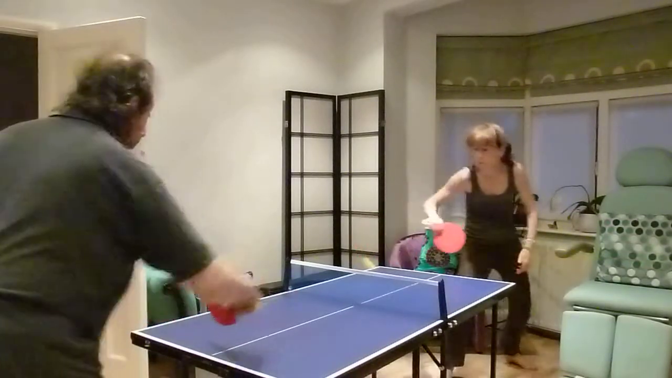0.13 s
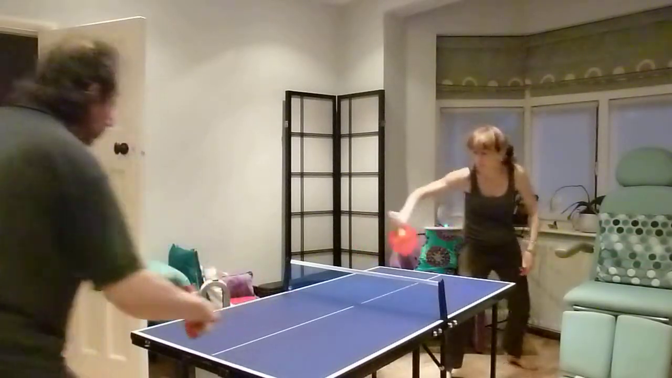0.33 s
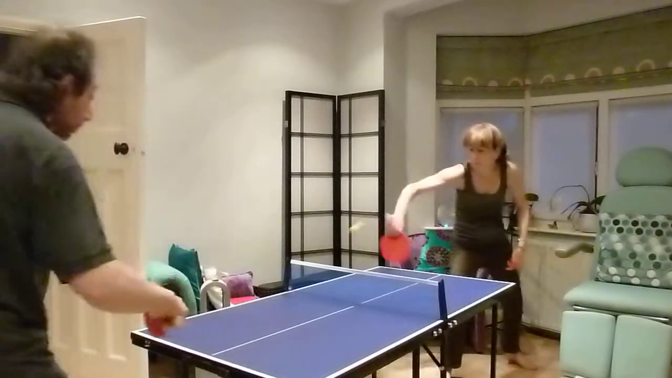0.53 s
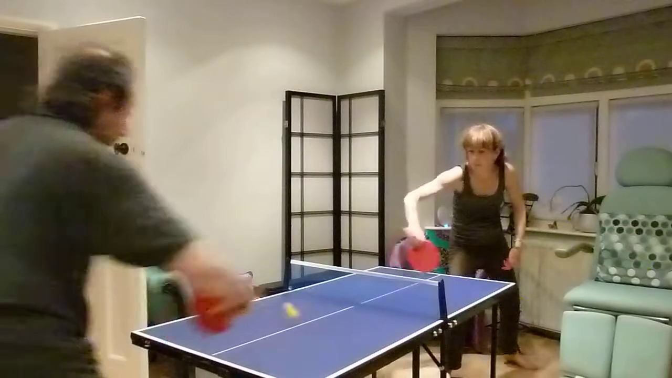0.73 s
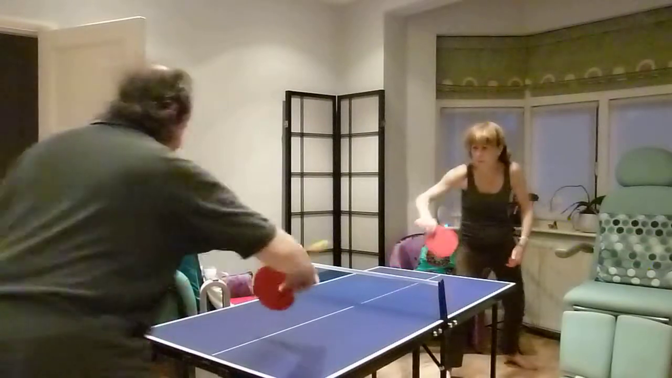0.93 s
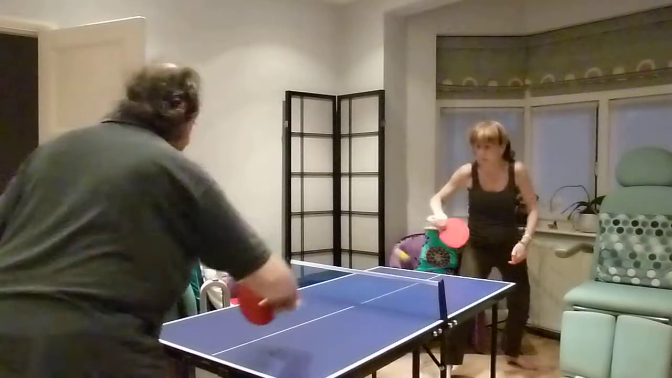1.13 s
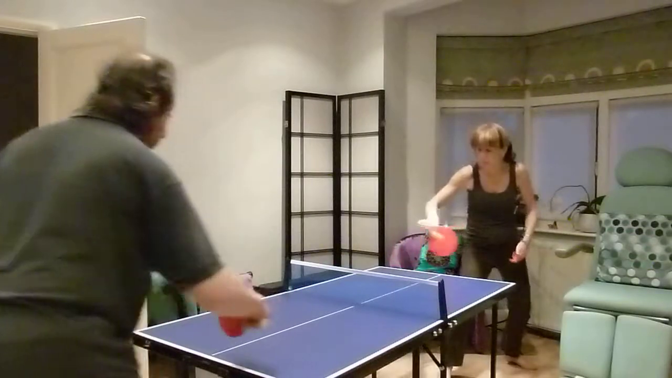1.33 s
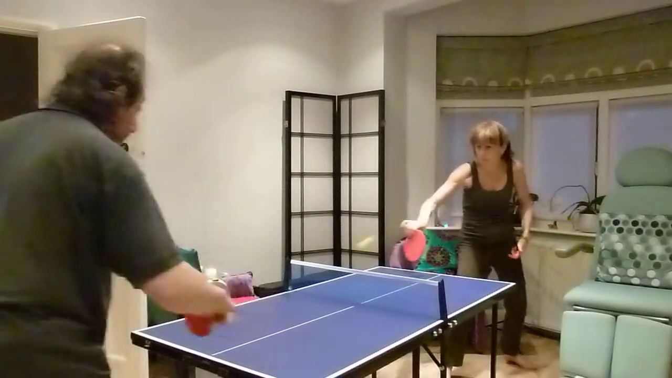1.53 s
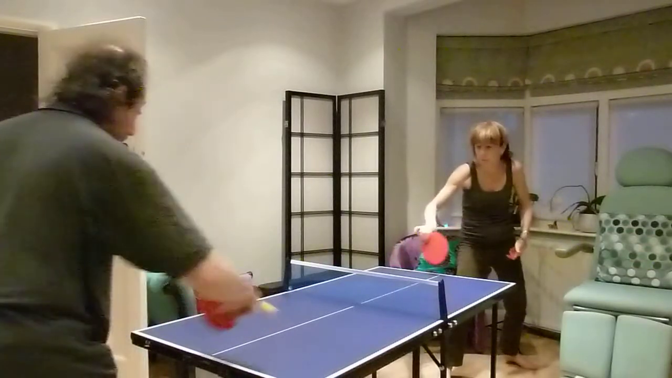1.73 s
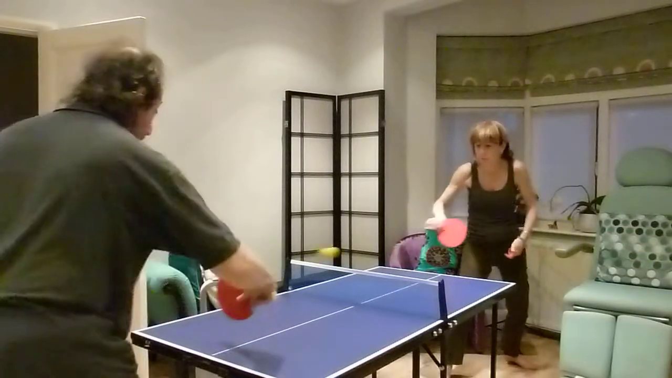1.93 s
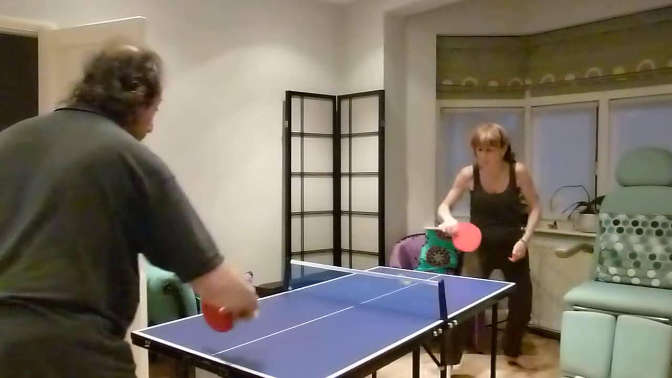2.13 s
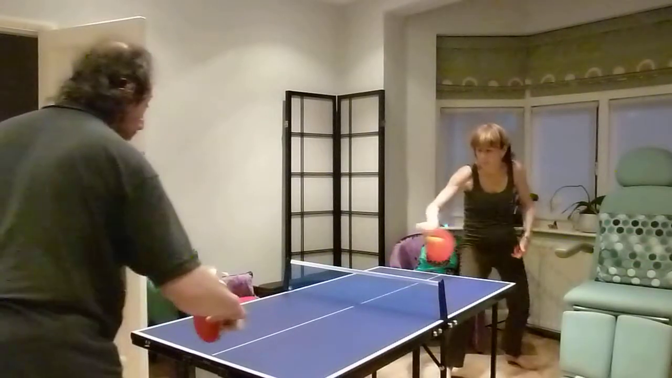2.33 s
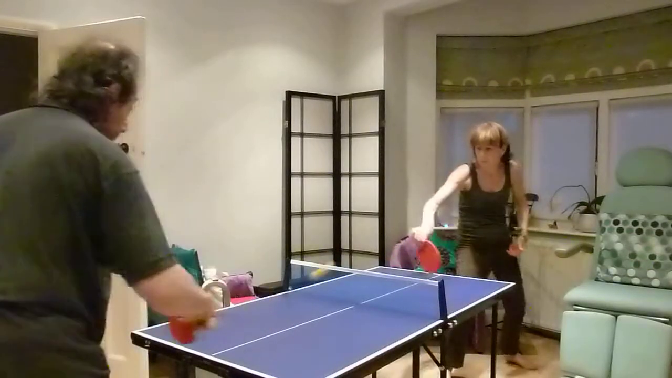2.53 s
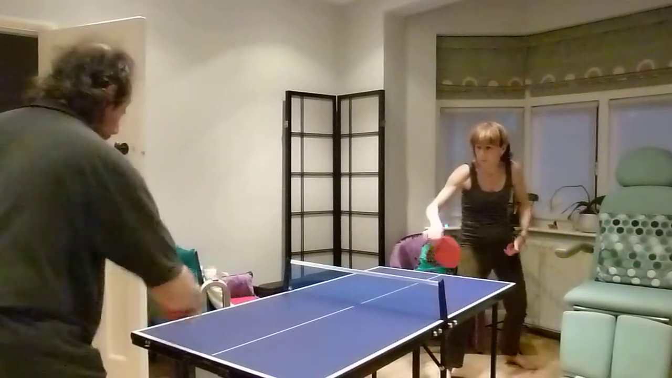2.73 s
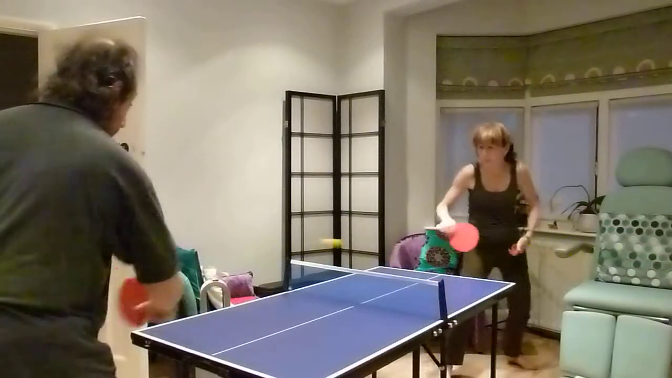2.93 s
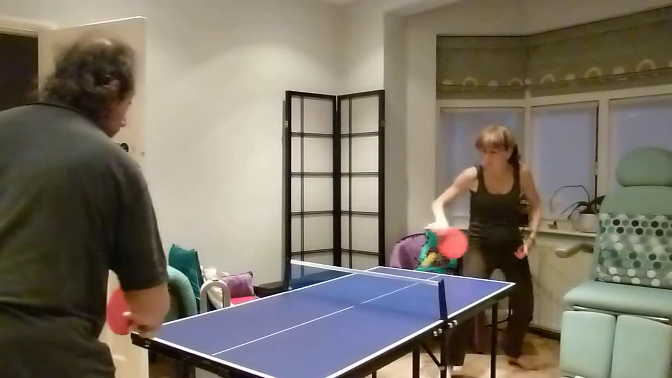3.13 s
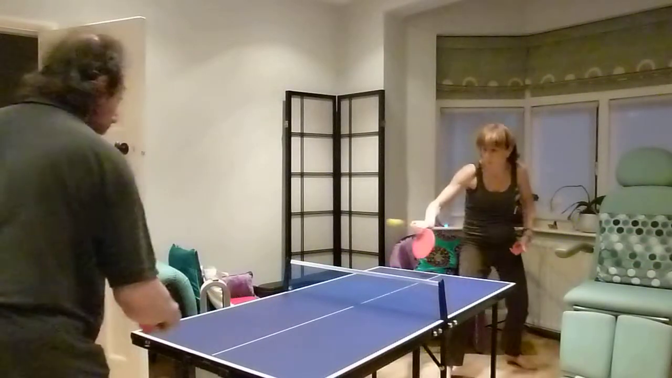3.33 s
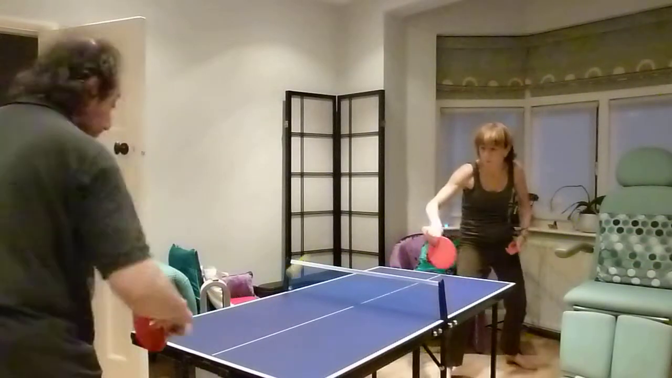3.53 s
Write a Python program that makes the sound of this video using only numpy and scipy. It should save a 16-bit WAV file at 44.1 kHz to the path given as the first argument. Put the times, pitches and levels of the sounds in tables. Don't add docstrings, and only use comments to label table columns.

```python
import sys
import numpy as np
from scipy import signal
from scipy.fft import rfft, irfft
from scipy.io import wavfile

SR = 44100
rng = np.random.default_rng(int(sys.argv[2]) if len(sys.argv) > 2 else 0)


def transcribe(signal):
    frames = np.atleast_2d(signal).T
    limited = np.clip(frames, -1, 1)
    pcm = np.round(limited * 32767).astype(np.int16)
    wavfile.write(sys.argv[1], SR, pcm)


def convert_level_to_amplitude(level_db):
    exponent = np.asarray(level_db, float) / 20
    return 10 ** exponent


N = 158760
LENGTH = 36000

# start in seconds, peak in dB, contact time in ms, table boom in dB,
# pitch of the spot struck in Hz.
BOUNCES = [
    (.2055, -11., 0.641, 4, 618),
    (.753, -9.5, 0.656, 0., 270),
    (1.2367, -9, 0.677, 1, 455),
    (1.72, -10, 0.619, -0.5, 273),
    (2.175, -12, 0.622, 2.5, 249),
    (2.6435, -10.5, 0.621, -1.5, 330),
    (3.138, -11, 0.591, 0.5, 450),
]
# start in seconds, peak in dB, blade pitch in Hz, rubber tick in dB, left lean in dB.
STROKES = [
    (0.364, -11, 879, 10.5, -1),
    (0.868, -14.5, 932, 6.5, -2.5),
    (1.348, -8, 875.4, -0.5, -1),
    (1.816, -12, 919.5, 0.5, 1.5),
    (2.349, -8.5, 882, -1, -0.5),
    (2.78, -10.5, 925.6, 2.5, -1),
    (3.225, -7, 873, -0.5, -1),
]
# peak in dB, blade pitch in Hz, rubber tick in dB, left lean in dB.
EARLIER_STROKE = (-9, 916, -25, 3.5)
# start in seconds, level in dB, thud pitch in Hz, scuff in dB,
# scuff length in seconds.
STEPS = [
    (0.026, -51.5, 484, 18.5, 0.0052),
    (0.156, -53.5, 265, 16, .006),
    (0.675, -54.5, 99, -8, 0.0044),
    (0.956, -50, 200, 11.5, 0.046),
    (2.557, -60.5, 493, -6, 0.01),
]
# frequency in Hz, level in dB, decay time t60 in seconds.
HALVES = [
    [(243, -0.5, 0.04), (330, 2, 0.033), (450, 9.5, 0.025), (599, 9, 0.021)],
    [(270, 1, 0.12), (216.6, -26.5, 0.034), (412, 9.5, 0.024), (552, 16.5, 0.02)],
]
# frequency in Hz, level in dB, decay time t60 in seconds.
LEGS = [(128.5, -16.5, 0.3), (95, -12, 0.15)]
# multiple of the blade pitch, level in dB, decay time t60 in seconds.
BLADES = [
    [(1., -11, .08), (1.35, -12, 0.014), (1.88, -6, 0.017), (3.4, -27, 0.0098), (2.5, -14.5, 0.0049),
     (4.8, -20.5, 0.0098), (1.045, -17, 0.08)],
    [(1., -6.5, .11), (1.35, -1, 0.0064), (1.72, -1.5, 0.011), (3.3, -16.5, 0.0098), (2.4, -10, 0.017),
     (4.6, -19, .004), (.97, -18, 0.15)],
]
# frequency in Hz, level in dB.
CLICK = [(100, -64.5), (400, -31), (1000, 2), (2000, 13.5), (3300, 25.5), (5000, 23.5), (6500, 19),
         (8000, 19.5)]
# frequency in Hz, level in dB.
TICK = [(100, -52.5), (400, -3), (1200, 6), (2000, -69.5), (3300, -53.5), (5000, 11.5), (6500, 0),
        (8000, -6.5)]
# frequency in Hz, decay time t60 in seconds.
ROOM = [(100, 0.48), (260, 0.56), (700, 0.44), (1840, 0.49), (4850, 0.45)]
# frequency in Hz, side level in dB.
SIDE_DB = [(60, -21.5), (250, -59), (500, -35.5), (1000, -12), (2000, -8), (4000, -5.5), (6000, -6.5),
           (8000, -1)]
# frequency in Hz, lead of the left in radians.
LEAD = [(100, -2.1), (800, 0.28), (1200, -1.2), (2400, -0.043), (3000, -0.94), (4400, -.35), (6300, -0.28)]
# frequency in Hz, level in dB.
AIR = [(18, -40), (30, -9.5), (150, -2), (922, -10), (1790, -13), (5960, -16.5), (8500, -28), (11000, -68),
       (18700, -120)]
# frequency in Hz, level in dB.
HISS = [(18, -35), (30, 9), (304, -5.5), (1010, -2.5), (4600, -14), (6710, -21.5), (8500, -59),
        (11000, -76), (18700, -120)]

HALF_OCTAVES_HZ = 40 * 2 ** np.arange(0, 8.1, .5)
BOUNCE_DB, BOOM_DB, STROKE_DB, TICK_DB = 3, -37.5, -21, -29
BOUNCE_NEAR_DB, STROKE_NEAR_DB, STEP_NEAR_DB = -6, -1, -40
CONTACT_SHAPE, RUBBER_MS = 1.416, 0.083
PING_HZ, PING_DB, PING_T60_S = 3390, -23.5, 0.019
SPOT_DB, SPOT_T60_S = -4, 0.071
SLIP_DB, SLIP_MS = -37, .12
WET_DB, DIRECT_DB, FIRST_WALL_S, MIXING_S = -25, -14, .0012, .015
EARLY_DB, EARLY_S = 9, 0.0046
CEILING_DB, RELEASE_DB_PER_S, SQUEEZE = -7.5, 139, 0.24


def bounce(k, db, ms, boom_db, hz):
    force = contact(ms)
    modes = list(HALVES[k % 2]) + [(hz, SPOT_DB, SPOT_T60_S)]
    boom = radiated(sum(convert_level_to_amplitude(level) * ring(force, mode_hz, t60) for mode_hz, level, t60 in modes))
    legs_hz, legs_db, legs_t60 = LEGS[k % 2]
    boom = boom + convert_level_to_amplitude(legs_db) * ring(force, legs_hz, legs_t60)
    click = coloured(force + convert_level_to_amplitude(SLIP_DB) * contact(SLIP_MS), CLICK)
    click = click + convert_level_to_amplitude(PING_DB) * ring(force, PING_HZ, PING_T60_S)
    return convert_level_to_amplitude(db + BOUNCE_DB) * 10 * (radiated(click) + convert_level_to_amplitude(BOOM_DB + boom_db) * boom)


def stroke(k, db, hz, tick_db):
    force = contact(RUBBER_MS)
    blade = 0
    for j, (ratio, level, t60) in enumerate(BLADES[k % 2]):
        blade = blade + (-1) ** j * convert_level_to_amplitude(level) * ring(force, hz * ratio, t60)
    tick = coloured(contact(RUBBER_MS / 3), TICK)
    return convert_level_to_amplitude(db) * 10 * (convert_level_to_amplitude(STROKE_DB) * blade + convert_level_to_amplitude(TICK_DB + tick_db) * tick)


def step(db, hz, scuff_db, length):
    t = np.arange(LENGTH) / SR / length
    scuff = rng.standard_normal(LENGTH) * t * np.exp(-t) * np.sqrt(0.011 / length)
    scuff = signal.lfilter([1, -.5], [1], scuff)
    thud = ring(contact(730.0 / hz), hz, 0.04)
    return convert_level_to_amplitude(db) * (10 * thud + convert_level_to_amplitude(scuff_db) * scuff)


def contact(ms):
    oversampling = 8
    t = np.arange(oversampling * 512) / (oversampling * SR)
    phase = np.clip(t / (ms / 1000), 0, 1)
    fine = np.abs(np.sin(np.pi * phase)) ** CONTACT_SHAPE * (phase < 1)
    pulse = signal.resample_poly(fine, 1, oversampling)
    return np.pad(pulse / pulse.sum(), (0, LENGTH - len(pulse)))


def ring(x, hz, t60):
    r, w = convert_level_to_amplitude(-60 / (t60 * SR)), 2 * np.pi * hz / SR
    return signal.lfilter([0, np.sin(w)], [1, -2 * r * np.cos(w), r * r], x + 1e-18)


def coloured(x, points):
    size = 1024
    hz = np.arange(size + 1) * SR / 2 / size + 1
    cepstrum = irfft(np.log(convert_level_to_amplitude(at_hz(points, hz))))
    cepstrum[1:size] *= 2
    cepstrum[size + 1:] = 0
    return signal.fftconvolve(x, irfft(np.exp(rfft(cepstrum))))[..., :x.shape[-1]]


def radiated(x):
    return signal.sosfilt(signal.butter(4, 200, "high", fs=SR, output="sos"), x)


def at_hz(points, hz):
    return np.interp(np.log(hz), np.log(np.array(points)[:, 0] + 1), np.array(points)[:, 1])


def band(x, low, high):
    return signal.sosfilt(signal.butter(2, [low, high], "band", fs=SR, output="sos"), x + 1e-18)


def room(count):
    t = np.arange(LENGTH) / SR
    density = np.clip((t / MIXING_S) ** 2 + 0.014, 0, 1) * (t > FIRST_WALL_S)
    draw = rng.standard_normal((count, 2, 2, LENGTH))
    present = rng.random((count, 1, 1, LENGTH)) < density
    level = convert_level_to_amplitude(WET_DB + EARLY_DB * np.exp(-t / EARLY_S))
    echoes = draw * present / np.sqrt(density + 1e-9) * level
    direct = convert_level_to_amplitude(DIRECT_DB) * (t == 0)
    out = np.zeros((count, 2, LENGTH))
    out[:, 0] = direct
    for k, (low, high) in enumerate(zip(HALF_OCTAVES_HZ, HALF_OCTAVES_HZ[1:])):
        hz = np.sqrt(low * high)
        dying = echoes[:, k % 2] * convert_level_to_amplitude(-60 * t / at_hz(ROOM, hz))
        mid, side = np.moveaxis(band(dying, low, high), 1, 0)
        turned = np.gradient(mid + band(direct, low, high), axis=1) / np.sin(2 * np.pi * hz / SR)
        out[:, 0] += mid
        out[:, 1] += convert_level_to_amplitude(at_hz(SIDE_DB, hz)) * side + np.tan(at_hz(LEAD, hz) / 2) * turned
    return out


def hush(points, db):
    x = coloured(rng.standard_normal(N + 4000), points)[4000:]
    return convert_level_to_amplitude(db) * x / x.std()


def rumble():
    lowpass = signal.butter(2, 91, fs=SR, output="sos")
    x = signal.sosfilt(lowpass, rng.standard_normal(N + 4000))[4000:]
    return convert_level_to_amplitude(-60.5) * x / x.std()


def scene():
    hits = [(s, 0, BOUNCE_NEAR_DB, bounce(k, *rest)) for k, (s, *rest) in enumerate(BOUNCES)]
    strokes = list(STROKES) + [(-.2, *EARLIER_STROKE)]
    for k, (s, *rest, lean) in enumerate(strokes):
        hits.append((s, lean, STROKE_NEAR_DB, radiated(stroke(k, *rest))))
    hits += [(s, 0, STEP_NEAR_DB, step(*rest)) for s, *rest in STEPS]
    out = np.zeros((2, N + 3 * LENGTH))
    for (s, lean, near_db, dry), answer in zip(hits, room(count=len(hits))):
        mid, side = signal.fftconvolve(answer, dry[None, :12000])[:, :LENGTH]
        mid = mid + convert_level_to_amplitude(near_db) * dry
        i = int(s * SR) + LENGTH
        out[:, i:i + LENGTH] += np.array([mid + side, mid - side]) * convert_level_to_amplitude([[lean / 2], [-lean / 2]])
    hits_heard = out[:, LENGTH:LENGTH + N]
    return hits_heard + hush(AIR, -60.5) + hush(HISS, -52) * [[1], [-1]] + rumble()


def top_cut(x):
    return signal.sosfilt(signal.butter(12, 8960, fs=SR, output="sos"), x)


def record(dry):
    x = signal.sosfilt(signal.butter(2, 55, "high", fs=SR, output="sos"), dry)
    slope = RELEASE_DB_PER_S * np.arange(N) / SR
    over = np.maximum(20 * np.log10(np.abs(x).max(0) + 1e-9) - CEILING_DB, 0)
    held = np.maximum(np.maximum.accumulate(over + slope) - slope, 0)
    x = x * convert_level_to_amplitude(-SQUEEZE * signal.lfilter([.05], [1, -.95], held))
    below = signal.sosfilt(signal.cheby2(14, 40, 8020, fs=SR, output="sos"), x)
    narrowed = .6 * x.mean(0) + .4 * x
    lobe = signal.sosfilt(signal.cheby2(3, 30, (7950, 9000), "band", fs=SR, output="sos"), narrowed)
    mix = signal.sosfilt(signal.cheby2(12, 60, 9100, fs=SR, output="sos"), below + convert_level_to_amplitude(-1.5) * lobe)
    return top_cut(mix)


dry = scene()
out = record(dry)
transcribe(out)
```